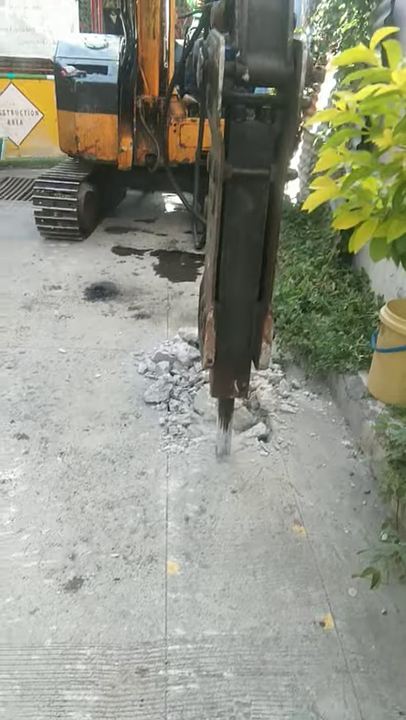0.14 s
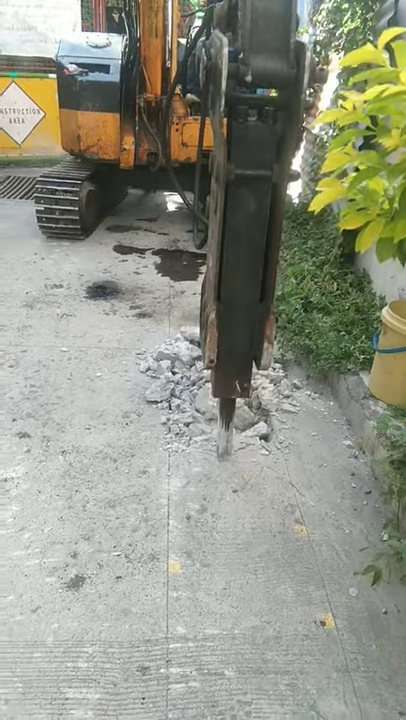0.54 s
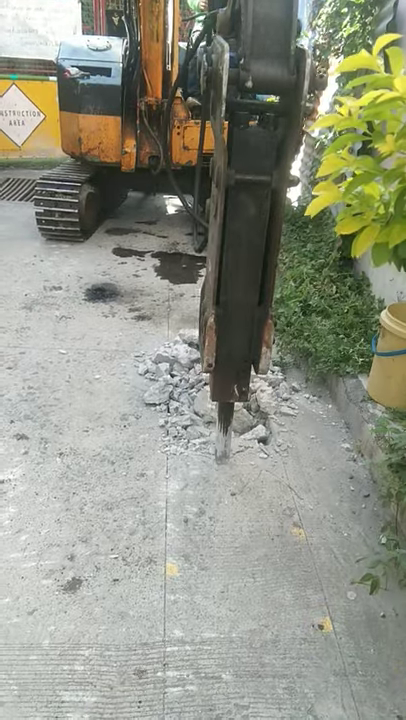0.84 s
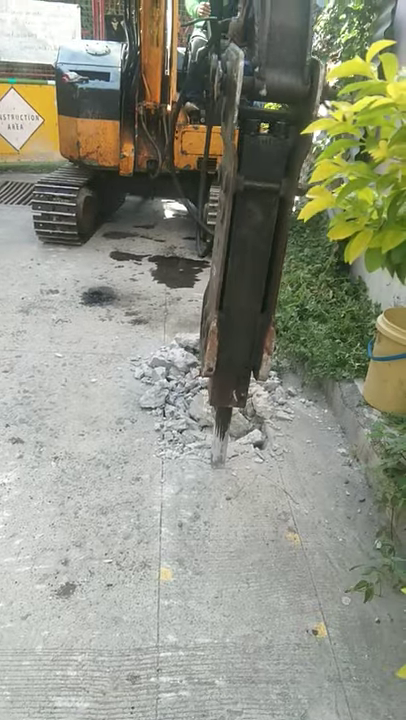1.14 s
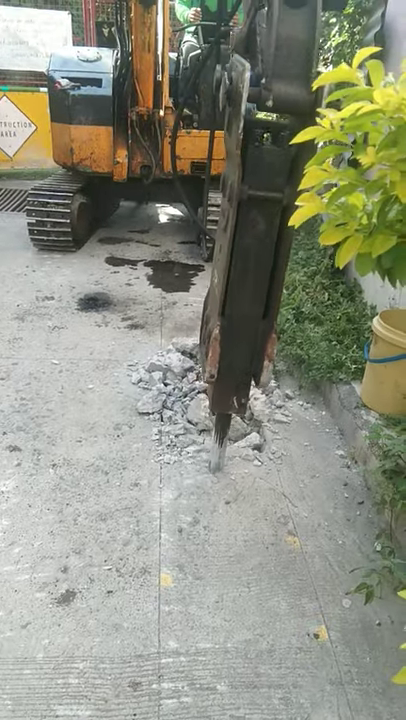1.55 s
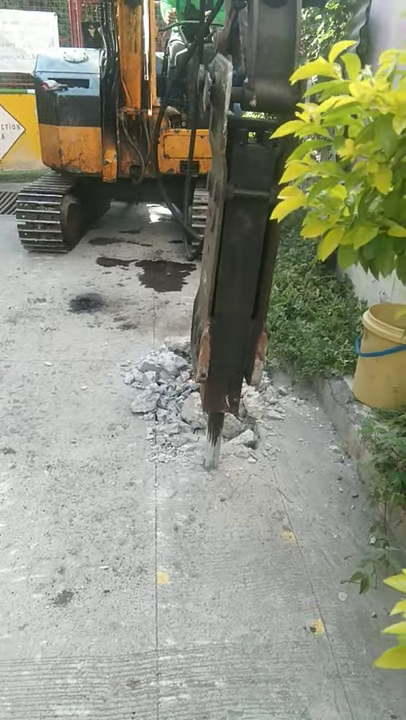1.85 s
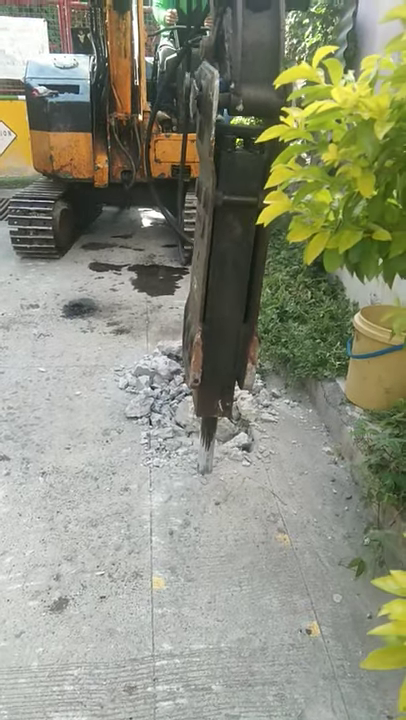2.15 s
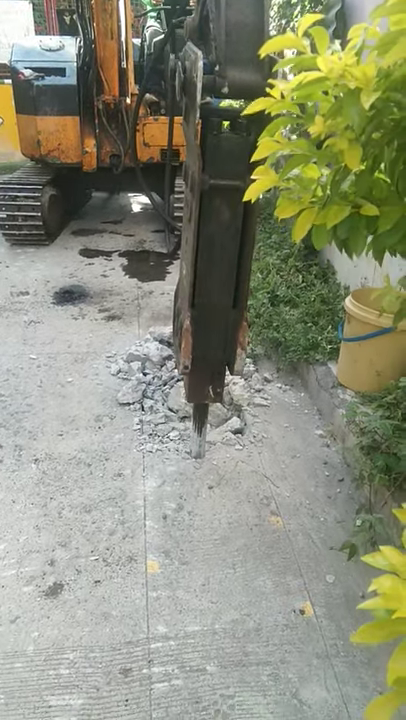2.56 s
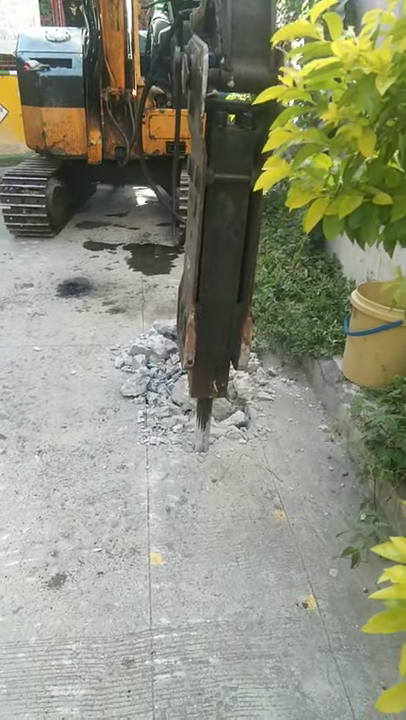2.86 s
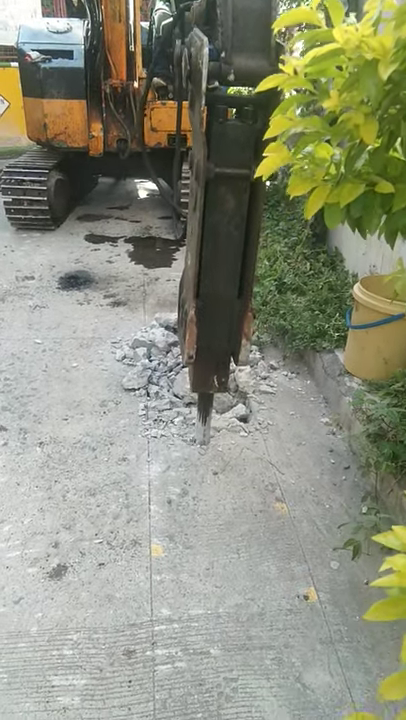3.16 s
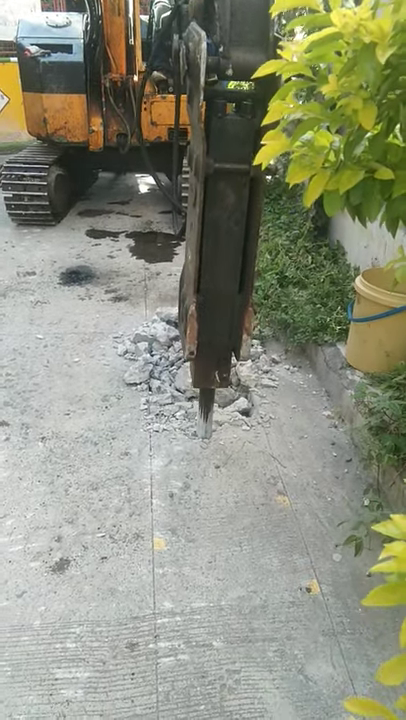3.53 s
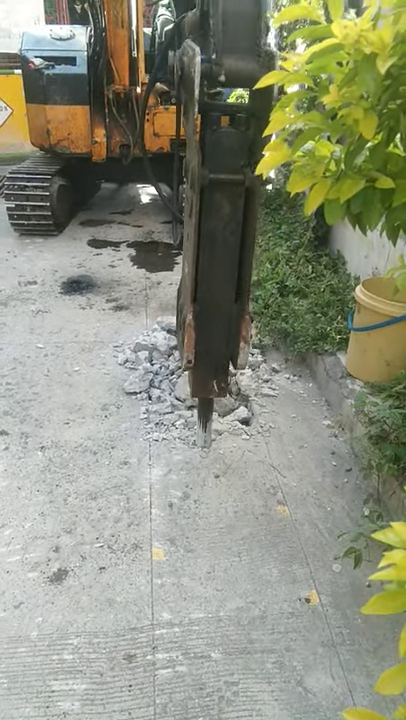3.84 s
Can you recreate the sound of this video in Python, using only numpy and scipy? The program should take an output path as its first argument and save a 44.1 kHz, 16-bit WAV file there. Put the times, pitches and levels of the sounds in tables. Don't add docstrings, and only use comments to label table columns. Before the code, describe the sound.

A hydraulic breaker pounds concrete from an abrupt mid-blow start at about 0.08 s, striking every 0.3 s until nearly 4 s. Each blow is a low thud and hard steel crack, with a clanking, ringing rebound shortly after and a rattling reflected tail. Early blows thud more; after 2 s they turn sharper and brighter. A lump drops near 0.93 s. An uneven diesel idle and faint pump hum continue behind.

```python
import sys
import numpy as np
from scipy import signal
from scipy.io import wavfile
from scipy.ndimage import uniform_filter1d, minimum_filter1d

SR = 44100
rng = np.random.default_rng(int(sys.argv[2]) if len(sys.argv) > 2 else 0)


def int16_out(signal):
    q = np.round(np.clip(np.atleast_2d(signal).T, -1, 1) * 32767)
    wavfile.write(sys.argv[1], SR, q.astype(np.int16))


def amplitude_ratio(level_db):
    exponent = np.asarray(level_db, float) / 20
    return 10 ** exponent


N = 176400
TIME_S = np.arange(N) / SR
RISE_S = .0007
EDGES_HZ = 160 * 2 ** (np.arange(21) / 3)
CENTRES_HZ = np.sqrt(EDGES_HZ[1:] * EDGES_HZ[:-1])


def rms_one(x):
    return x / np.sqrt(np.mean(x ** 2) + 1e-20)


def at_hz(points, hz):
    points = np.array(points)
    return np.interp(np.log(hz), np.log(points[:, 0]), points[:, 1])


def butter(x, order, hz, kind):
    return signal.sosfilt(signal.butter(order, hz, kind, fs=SR, output="sos"), x)


def clicks(s, gain):
    out = np.full(N, 1e-18)
    np.add.at(out, np.clip((np.asarray(s) * SR).astype(int), 0, N - 1), gain)
    return out


def smooth(x, time_s):
    a = np.exp(-1 / (time_s * SR))
    return signal.lfilter([1 - a], [1, -a], x)


def fade(x, t60, rise_s=RISE_S):
    r = amplitude_ratio(-60 / (t60 * SR))
    return smooth(signal.lfilter([1], [1, -r], x), rise_s)


def fades(s, gain, t60, rise_s=RISE_S):
    out = np.zeros(N)
    for start, g, length in zip((s * SR).astype(int), gain, t60):
        t = np.arange(min(N - start, SR // 2)) / SR
        envelope = g * amplitude_ratio(-60 * t / length) * (1 - np.exp(-t / rise_s))
        out[start:start + len(t)] += envelope ** 2
    return out


def ring(x, hz, t60):
    r, w = amplitude_ratio(-60 / (t60 * SR)), 2 * np.pi * hz / SR
    return signal.lfilter([0, np.sin(w)], [1, -2 * r * np.cos(w), r * r], x)


def peak(x, hz, width_hz):
    return ring(x, hz, np.log(1000) / (np.pi * width_hz))


def double_peak(x, hz, width_hz):
    return peak(peak(x, hz, width_hz), hz, width_hz)


def drift(rate):
    r = np.exp(-80 * np.pi * rate / SR)
    slow = signal.lfilter([1], [1, -2 * r, r * r], rng.standard_normal(N // 40 + 502))[500:]
    return np.interp(np.arange(N) / 40, np.arange(len(slow)), rms_one(slow))


def band_shares(colour):
    power = amplitude_ratio(2 * at_hz(colour, CENTRES_HZ)) * (CENTRES_HZ > colour[0][0])
    return power / np.sum(power * np.diff(EDGES_HZ)) * SR / 2


def band_noise(firm, loose):
    white, shared, out = rng.standard_normal((2, N)), drift(45), 0
    for k, (firm_powers, loose_powers) in enumerate(zip(zip(*firm), zip(*loose))):
        rattle = amplitude_ratio(2 * 1 * (shared + drift(26.7)) / np.sqrt(2))
        power = sum(firm_powers) + rattle * sum(loose_powers)
        out = out + butter(white[k % 2], 2, EDGES_HZ[k:k + 2], "band") * np.sqrt(power)
    return out


def steel(s, db, modes):
    contact_width_hz, stagger_s, scatter_db, longest_t60_s = 600, .007, 3.5, .3
    scatter = scatter_db * rng.standard_normal((len(s), len(modes)))
    late = stagger_s * rng.random((len(s), len(modes))) ** 2
    out = 0
    for k, (hz, level_db, t60) in enumerate(modes):
        t60 = min(t60, longest_t60_s)
        hits = clicks(s + late[:, k], amplitude_ratio(db + level_db + scatter[:, k]) * (-1) ** k)
        soft = peak(np.diff(hits, prepend=0), hz, contact_width_hz)
        soft = soft * contact_width_hz / hz / np.sinc(hz / SR)
        out = out + ring(soft, hz, t60) + ring(soft, hz * 1.008, t60 / 2)
    return out


def chatter(x):
    return x * amplitude_ratio(2.5 * drift(39))


def wind():
    return amplitude_ratio(-43.5) * rms_one(butter(rng.standard_normal(N), 2, [15, 40.2], "band"))


# (frequency [Hz], level [dB rms])
PUMP_TONES = [(301.5, -43.5), (430.7, -57), (452.2, -44.5), (559.9, -44)]


def pump():
    return sum(amplitude_ratio(db) * rms_one(peak(rng.standard_normal(N), hz, 18.0)) for hz, db in PUMP_TONES)


# (time [s], exhaust level [dB], clatter level [dB])
ENGINE_LEVEL = [(0, -24, -32), (1.3, -23.5, -31.5), (2.6, -27, -33), (4, -25.5, -33.5)]
# (frequency [Hz], density [dB per Hz])
CLATTER_COLOUR = [(110, -35), (180, 1), (587, -28), (696, -14), (1340, -13), (1560, -19), (2900, -12),
                  (6750, -22), (16000, -76)]


def engine_clatter():
    s, _, db = np.transpose(ENGINE_LEVEL)
    power = amplitude_ratio(2 * np.interp(TIME_S, s, db))
    return (share * power for share in band_shares(CLATTER_COLOUR))


# (place in the cycle [0-1], level [dB])
FIRING_PULSES = [
    (0.001, 7.5),
    (0.152, 1),
    (0.502, 5),
    (.75, -1.5),
]


def exhaust():
    cycle_hz, first_s, jitter_s, scatter_db = 18.798, .037, .0004, 1.6
    place, db = np.transpose(FIRING_PULSES)
    cycles = np.arange(int(N / SR * cycle_hz))[:, None]
    chance = rng.standard_normal((2, len(cycles), len(place)))
    s = (first_s + (cycles + place) / cycle_hz + jitter_s * chance[0]).ravel()
    puffs = clicks(s, amplitude_ratio(db + scatter_db * chance[1]).ravel() * (s < N / SR))
    pipe = rms_one(double_peak(puffs, 130.4, 42))
    drum = amplitude_ratio(-2) * rms_one(double_peak(puffs, 99, 65))
    bark = amplitude_ratio(-19.5) * rms_one(double_peak(puffs, 324, 85))
    s, db, _ = np.transpose(ENGINE_LEVEL)
    return butter(pipe + drum + bark, 4, 62, "high") * amplitude_ratio(np.interp(TIME_S, s, db))


# (time [s], level [dB])
RUBBLE_DROPS = [
    (0.923, -18),
    (0.938, -19),
]


def rubble():
    s, db = np.transpose(RUBBLE_DROPS)
    clack = rms_one(peak(rng.standard_normal(N), 1140, 990))
    return clack * fade(clicks(s, amplitude_ratio(db)), .046)


# (frequency [Hz], level [dB])
PLATE_COLOUR = [(900, -21.5), (2000, -12.5), (3200, 0.5), (6500, 4.5), (8500, -11), (11000, -22),
                (13000, -45), (15500, -12)]


def plates(count):
    low_hz, high_hz, t60_s = 880, 14880, .21
    hz = np.linspace(low_hz ** .5, high_hz ** .5, count) ** 2 * rng.uniform(.985, 1.015, count)
    spread_db, longer = rng.normal(0, 3, count), rng.uniform(.6, 1.4, count)
    return np.transpose([hz, at_hz(PLATE_COLOUR, hz) + spread_db, t60_s * longer])


# (time [s], level [dB], ring [dB], tail length [factor])
REBOUND_HITS = [(.1, -17, -2, 0.47), (0.3974, -11, -7, 0.61), (0.6994, -12.5, -8, 0.96),
                (1.0134, -7, -10, 0.65), (1.0849, -58, 7, 1), (1.3314, -8, -3, 0.44), (1.4252, -34, -6, 1),
                (1.6194, -6, -8, 0.58), (1.9185, -2.5, -6.5, 0.52), (2.2333, -1.5, -3, 0.4),
                (2.5094, -5, 1, 0.5), (2.5321, -0.5, -6, 0.55), (2.825, -0.5, -2, 0.48),
                (3.1168, 1.5, -3, 0.43), (3.4072, -0.5, -1.5, 0.6), (3.6804, -7.5, -12, 0.56),
                (3.703, 2, 0, 0.55), (3.8546, -33.5, 9, 0.66)]
# (frequency [Hz], level [dB], t60 [s])
FREE_MODES = [(1115, -7, .3), (3070, 0, .22), (3540, -5, .22), (3885, -7, .22), (4542, -4, .2),
              (5125, -7, .17), (5426, -7, .28), (6182, -5, .3), (6438, -5, .28), (7133, -8, .22),
              (7849, -8, .36), (9280, -17, .33), (10100, -25, .25), (11300, -33, .28)]


def free_chisel(housing):
    s, db, ring_db, _ = np.transpose(REBOUND_HITS)
    return steel(s, db + ring_db - 9.5, FREE_MODES) + steel(s, db + ring_db - 19, housing)


# (frequency [Hz], density [dB per Hz])
KNOCK_COLOUR = [(470, -49), (800, -9), (1110, -4.5), (1290, -16.5), (2630, -1.5), (3060, 0), (5650, -7.5),
                (6250, -2.5), (16000, -117)]
# (frequency [Hz], t60 [s])
TAIL_DECAY = [(200, 0.44), (1000, 0.63), (3000, 0.47), (7000, 0.38), (14000, 0.46)]


def rebound_knocks():
    rise_s = .0029
    s, db, _, long = np.transpose(REBOUND_HITS)
    snap = fade(clicks(s, amplitude_ratio(db + 1)), .021, rise_s) ** 2
    for hz, share in zip(CENTRES_HZ, band_shares(KNOCK_COLOUR)):
        yield share * (snap + fades(s, amplitude_ratio(db - 4), at_hz(TAIL_DECAY, hz) * long, rise_s))


# (time [s], level [dB], thud [dB], casing boom [dB], tail length [factor])
PISTON_BLOWS = [(.045, -1, 6.5, -1, 1.04), (0.3421, 2.5, 4.5, -1.1, 0.81), (0.6549, 1, 2.5, 2.1, 0.61),
                (0.9617, -0.5, 2.5, 0.8, 0.85), (1.2635, 1, 3.5, 2.2, 0.76), (1.5623, 3, 0.5, 2, 0.7),
                (1.8607, 4, 2, 1.1, 0.6), (2.1715, 5.5, 1.5, -0.7, 0.72), (2.4728, 3.5, -2.5, -1.5, 0.7),
                (2.7661, 4, -3.5, -1.8, 0.77), (3.0579, 5, -4.5, -5.2, 0.76), (3.3488, 6, -9, -4, 0.8),
                (3.6456, 6, -6.5, -5.3, 0.73), (3.9589, -3, -5, -1.2, 2.5)]


def valve_ticks():
    s = np.transpose(PISTON_BLOWS)[0]
    tick = fade(clicks(s - .0095, amplitude_ratio(-14)), .07) ** 2
    return (share * tick for share in band_shares(KNOCK_COLOUR))


def ground_thuds():
    thud_hz, width_hz = 450, 370
    s, _, thud_db, _, _ = np.transpose(PISTON_BLOWS)
    push = clicks(s - .0028, amplitude_ratio(thud_db))
    swing = double_peak(push, thud_hz, width_hz) * 2 * np.pi * width_hz / SR
    slab = amplitude_ratio(-12.5) * ring(push, 201.3, .17)
    return 2 * swing - slab


# (frequency [Hz], level [dB], t60 [s])
PRESSED_MODES = [(975, -8, .15), (2330, -9, .1), (2708, -9, .08), (2950, -5, .08), (3149, -4, .1),
                 (3492, -2, .12), (4337, 0, .1), (5322, -3, .16), (6200, -8, .1), (6977, -11, .1),
                 (7270, -11, .08), (10240, -22, .08), (11700, -29, .1)]


def pressed_chisel(housing):
    s, db = np.transpose(PISTON_BLOWS)[:2]
    held = housing * [1, 1, .3]
    return steel(s, db - 9.5, PRESSED_MODES) + steel(s, db - 19, held)


# (frequency [Hz], density [dB per Hz])
TAIL_COLOUR = [(88, -26), (150, 5.5), (414, -8), (998, -7.5), (1480, -6), (1870, -3), (6770, -6),
               (15100, -72), (16000, -40)]


def blow_tails():
    s, db, _, boom_db, long = np.transpose(PISTON_BLOWS)
    for hz, share in zip(CENTRES_HZ, band_shares(TAIL_COLOUR)):
        yield share * fades(s, amplitude_ratio(db - 7 + boom_db * (hz < 1800)), at_hz(TAIL_DECAY, hz) * long)


# (frequency [Hz], density [dB per Hz])
CRACK_COLOUR = [(290, -60), (500, 12), (1980, 2), (2930, 10.5), (4280, 4), (7100, -12), (10800, -11),
                (15100, -46), (16000, -48)]


def steel_cracks():
    s, db = np.transpose(PISTON_BLOWS)[:2]
    crack = fade(clicks(s, amplitude_ratio(db)), .045) ** 2
    return (share * crack for share in band_shares(CRACK_COLOUR))


def scene():
    housing = plates(count=44)
    pressed, free = pressed_chisel(housing), free_chisel(housing)
    rings = chatter(pressed) + chatter(free)
    noise = band_noise(firm=[steel_cracks(), engine_clatter()],
                       loose=[blow_tails(), rebound_knocks(), valve_ticks()])
    return (noise + rings + ground_thuds() + rubble() + exhaust() + pump() + wind())[None]


def top_cut(x):
    return signal.sosfilt(signal.butter(12, 16490, fs=SR, output="sos"), x)


def record(dry):
    threshold_db, release_db_per_s, attack_s, ratio = -29.5, 48, .0024, .28
    top, look_ahead, start_s = .78, 65, .083
    release = release_db_per_s * np.arange(N) / SR
    level = 10 * np.log10(uniform_filter1d(dry[0] ** 2, size=220) + 1e-12)
    held = np.maximum.accumulate(level + release) - release
    over = np.maximum(held - threshold_db, 0)
    x = dry * amplitude_ratio(-ratio * smooth(over, attack_s))
    safe_gain = minimum_filter1d(top / np.maximum(np.abs(x), top), size=2 * look_ahead + 1)
    x = x * uniform_filter1d(safe_gain, size=look_ahead)
    x = x * (np.arange(N) > start_s * SR)
    x = signal.sosfilt(signal.cheby2(10, 50, 16300, fs=SR, output="sos"), x)
    mix = butter(x, 2, 43.3, "high")
    return top_cut(mix)


dry = scene()
out = record(dry)
int16_out(out)
```